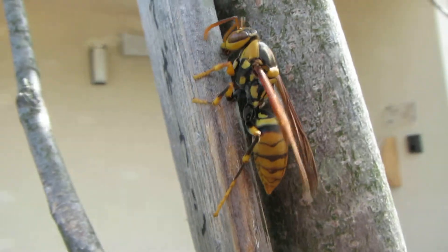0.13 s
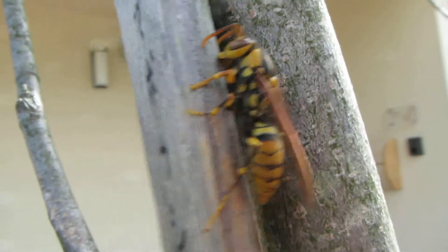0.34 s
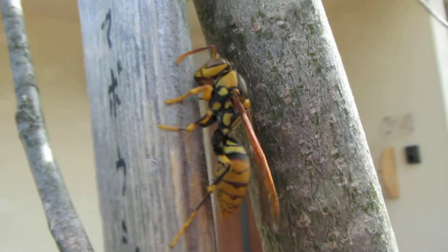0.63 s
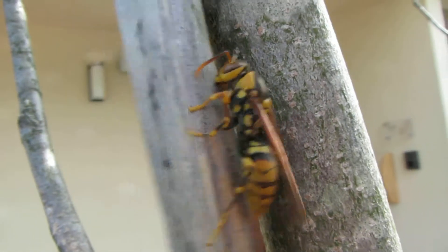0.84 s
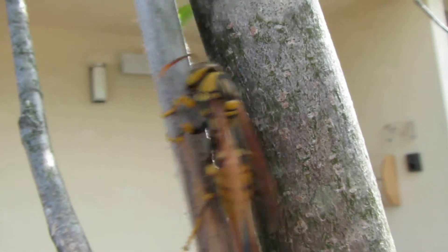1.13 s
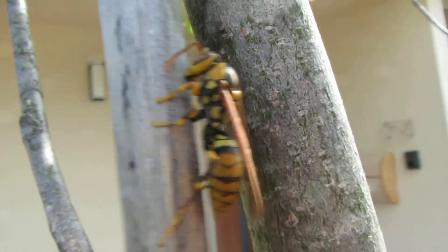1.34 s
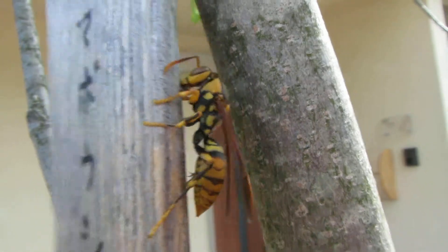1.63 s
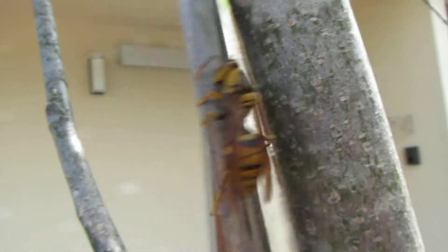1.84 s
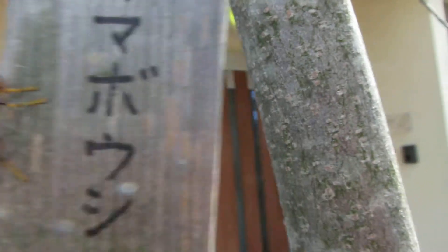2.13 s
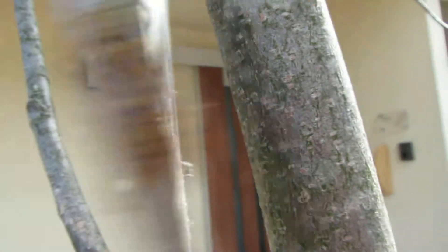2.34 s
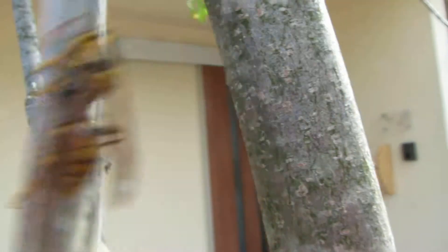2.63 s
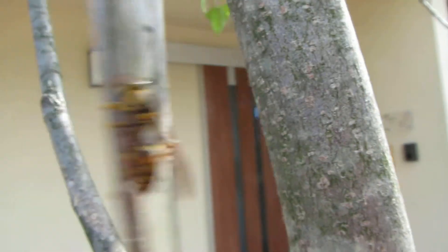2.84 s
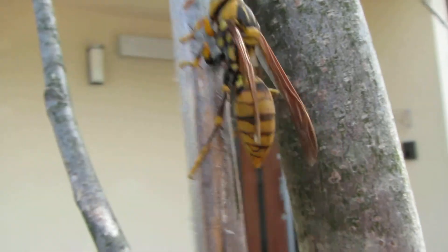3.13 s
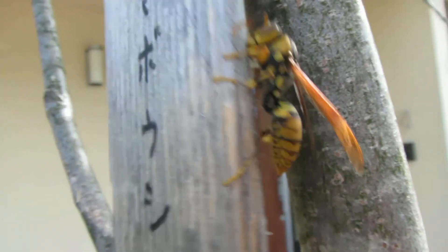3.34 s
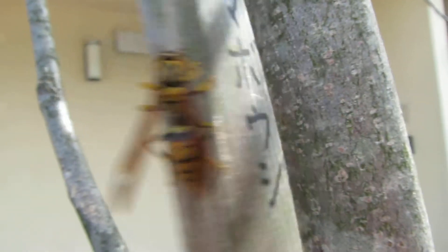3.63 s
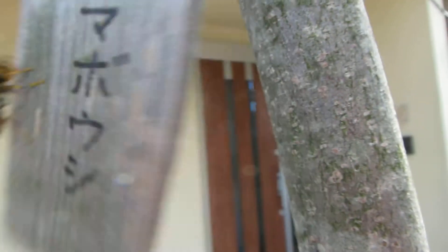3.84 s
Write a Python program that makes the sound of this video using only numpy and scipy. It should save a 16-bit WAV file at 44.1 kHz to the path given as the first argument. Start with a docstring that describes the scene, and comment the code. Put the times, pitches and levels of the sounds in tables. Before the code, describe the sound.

A wooden tag taps lightly on a tree, then clatters and knocks harder in the second half. Gusty wind buffets the nearby microphone, drops briefly and returns, over faint bird chirps and a soft outdoor hiss.

```python
"""A thin wooden tag on a string swings in gusty wind and knocks against a tree trunk, near a small camera.
From the start, eddies buffet the two microphone ports over a distant hum and hiss, and a far bird chirps.
From 0.6 s the tag strikes and grazes the bark, each knock ringing its modes. An insect hiss throbs from
1.3 to 2.7 s; near 2.5 s the tag clatters and the bird calls again. A hard knock falls in a lull at 3 s,
then the gusts return and the hardest knock comes just before the end."""
import sys
import numpy as np
from scipy import signal
from scipy.fft import rfft, irfft
from scipy.io import wavfile
from scipy.ndimage import uniform_filter1d

SR = 44100
rng = np.random.default_rng(int(sys.argv[2]) if len(sys.argv) > 2 else 0)


def transcribe(u):
    """Save the signal u as a 16-bit wav file named by the first command-line argument.

    u: samples, shape (n,) or (channels, n), limited to [-1, 1]; the rate is SR.
    q: integer samples, one column per channel.
    """
    v = np.clip(np.atleast_2d(u).T, -1, 1)
    q = np.round(v * 32767).astype(np.int16)
    wavfile.write(sys.argv[1], SR, q)


N = 176400

# Spectrum of the outdoor background: frequency_hz, gain_db
AIR_SPECTRUM = [(24, -40), (40, -19.5), (158, 3), (230, 3.5), (295, -10), (379, -4.5), (511, -10), (763, 3),
                (822, -7), (979, -3), (1260, -9), (1500, -8), (1700, -10), (3680, -21.5), (5920, -17.5),
                (11000, -26), (12700, -31), (15100, -37), (15700, -47)]
# Humps in the distant hum: centre_hz, width_hz, gain_db
HUM_PEAKS = [(475, 82, 11.5), (754, 47, 4), (1124, 160, 7.5), (1477, 31, 6.5)]
# Drift of the background: time_s, level_db, treble_db
BACKGROUND_LEVELS = [(0.0, -63, -0.5), (0.29, -60.5, 2), (0.5, -66.5, 0.5), (0.91, -61.5, -3),
                     (1.06, -65, -1), (1.57, -62, 2), (2.66, -58, 5.5), (2.88, -56.5, 6.5),
                     (3.89, -54.5, -3), (4.0, -51, -13)]
# Likeness of the background at the two ports: frequency_hz, correlation
COHERENCE = [(60, 0.31), (300, 1), (1400, 0.13), (3100, 0.75), (6800, .3), (12000, -0.013)]
# Strength of the insect throb: time_s, depth_db
THROB_DEPTH = [(1.3, 0), (1.6, 4), (2.4, 4), (2.7, 0)]
# Bird notes: start_s, length_s, start_hz, middle_hz, end_hz, level_db
BIRD_NOTES = [(0.169, 0.014, 4150, 4320, 4500, -65), (0.212, 0.021, 4280, 5080, 4020, -58),
              (0.231, 0.016, 4180, 4520, 3820, -54), (0.256, 0.02, 4310, 4520, 4460, -57),
              (0.256, 0.015, 3000, 3400, 3200, -67), (0.269, 0.024, 3440, 3290, 3000, -64),
              (0.304, 0.025, 3390, 3300, 3200, -66.5), (0.389, .016, 4280, 4680, 5000, -70),
              (0.618, .085, 3400, 3450, 3380, -82), (.705, .05, 3260, 3050, 2850, -75),
              (3.486, 0.041, 2950, 2790, 2650, -69), (0.396, 0.031, 3650, 3270, 2900, -70.5),
              (2.522, 0.0203, 3950, 5000, 4200, -64), (2.541, .016, 4550, 4260, 3700, -55),
              (2.556, .02, 4960, 4870, 4850, -69), (2.57, 0.019, 2920, 3300, 3700, -64),
              (2.576, 0.0214, 3520, 3300, 2900, -59), (2.604, 0.04, 3280, 3300, 3240, -66)]
# Gusts on the ports: time_s, level_db, buffet_re_rumble_db, leftward_lean
GUSTS = [(0.0, -36, -8, 4), (0.02, -27.5, -11, 4.5), (0.08, -36.5, -44, -8.5), (0.121, -30.5, -9, 6.5),
         (0.18, -32.5, -17, -2), (0.26, -35.5, -25.5, 4), (0.308, -25, -2.5, -0.5),
         (0.369, -29.5, -11, 4.5), (0.41, -39.5, -22, 0), (0.479, -32.5, -15, 0), (0.588, -30.5, -64, -3),
         (0.629, -63.5, 3.5, 3), (0.8, -46, -49, -4), (0.821, -44, -16, 8.5), (0.878, -20.5, -16.5, -3),
         (0.922, -36.5, -22, 2.5), (0.959, -24.5, -5, 3.5), (0.99, -31, -34, -17), (1.01, -50.5, -3, 1.5),
         (1.061, -26, -13, -2), (1.091, -47, -49, -3), (1.16, -41.5, -28.5, 2), (1.299, -24.5, -1, 3.5),
         (1.36, -36, 1, -2), (1.399, -37, -7.5, -3.5), (1.44, -53.5, -54, 5.5), (1.48, -31.5, -19, 1),
         (1.49, -39.5, -48, -0.5), (1.54, -58.5, -31, -4), (1.59, -42.5, -14.5, 3.0),
         (1.68, -44.5, -19, -2.5), (1.71, -33.5, -33, 0), (1.84, -49.5, -41, 0), (1.871, -43.5, -4.5, 12),
         (1.902, -24.5, 2, 6.5), (1.929, -47, -14.5, 7), (2.08, -48.5, -39, -2.5), (2.19, -47.5, -58, 8),
         (2.26, -56.5, -26, -2.5), (2.32, -41.5, -49, 8), (2.341, -29, -19, -0.5), (2.39, -40, -32, -2),
         (2.479, -38.5, 11.5, -0.5), (2.52, -35, -25, -1), (2.629, -33.5, -23, 4.5),
         (2.72, -60.5, -6.5, -0.5), (3.17, -71, 7, -3), (3.298, -35.5, -14.5, 6.5), (3.36, -37, -26, -6.5),
         (3.42, -50, -0.5, 5), (3.48, -47.5, -12, -1), (3.61, -36.5, -40, 2), (3.629, -24.5, -12.5, 3.5),
         (3.73, -23, -24, 7.5), (3.779, -39.5, -27, 1), (3.832, -25, -8.5, 1.5), (3.951, -27.5, 6, 4.5),
         (4.0, -26, -7, -2)]
# Spectra of the wind's low rumble and upper buffeting: frequency_hz, gain_db
RUMBLE_SPECTRUM = [(12, -53), (24, -37), (55, -2), (123, 6.5), (189, 1), (243, -4.5), (441, -20),
                   (700, -34.5), (910, -62), (1540, -120)]
BUFFET_SPECTRUM = [(120, -3.5), (250, 7), (350, 3), (600, -3.5), (1000, -15.5), (1600, -42.5), (3000, -72),
                   (6000, -125)]
# Strongest single eddies: time_s, level_db, width_ms, left_re_right_db
EDDY_SLAPS = [(0.2968, -19, 0.73, 9), (.3172, -24, 0.5, -30), (0.357, -11.5, 0.67, 27),
              (0.3705, -24, 0.8, 10), (0.4656, -29.5, 0.66, -23.5), (0.834, -18, 1.06, 34),
              (0.8749, -30.5, 0.72, -12), (0.9556, -11, 0.89, 32), (.9729, -29, 0.67, -19),
              (1.0566, -22, 0.97, -32), (1.26, -19, 0.79, 15), (1.2681, -16.5, 0.57, 33),
              (1.2984, -15.5, 0.73, 2), (1.309, -11.5, 1.22, 17), (1.3238, -14.5, 0.75, 29),
              (1.3666, -23, 1, 22), (1.475, -22, 0.9, 28), (1.724, -19.5, 1.24, -23),
              (1.767, -29.5, 1.5, 11), (1.8823, -26, 0.96, 31), (1.9068, -10, 0.8, 17),
              (2.337, -28, 0.79, -28), (2.474, -17.5, 0.78, -25), (3.6481, -17, 0.59, 30),
              (3.6837, -17, 0.88, 20), (3.721, -15, 1.37, 32), (3.737, -19, 0.76, 25),
              (3.853, -16.5, 1.01, 20), (3.8738, -16, 0.78, 25), (3.9006, -16.5, 0.87, 28),
              (3.9349, -24, .8, 25), (3.9491, -10.5, 0.62, 15)]
# Sharp pops at the moments of the hardest eddies: time_s, level_db
SHARP_POPS = [(0.3569, -35.5), (0.956, -40), (1.3077, -36.5)]
# Spectrum of a pop: frequency_hz, gain_db
POP_SPECTRUM = [(500, 11), (1500, -8.5), (3000, -2.5), (5000, -12), (9000, -27), (15000, -46)]
# Wood grazing bark: start_s, peak_db, decay_s
BARK_TICKS = [(0.623, -55, 0.003), (0.628, -49, 0.0027), (0.641, -53, 0.003), (0.659, -54.5, 0.0037),
              (0.836, -57, 0.0032), (0.853, -50.5, 0.0024), (1.311, -44, 0.0016), (1.584, -47.5, 0.0021),
              (1.592, -52, 0.0027), (1.8566, -49, 0.0034), (2.065, -50, 0.0036), (2.229, -59, 0.0027),
              (2.459, -50, 0.002), (2.4765, -38, 0.0017), (2.987, -39.5, 0.01), (3.125, -40, 0.008),
              (3.135, -46, 0.0042), (3.3797, -41.5, 0.0016), (3.46, -47, 0.021), (3.589, -46.5, 0.0036),
              (3.723, -38, 0.0046), (3.9434, -43, 0.0031)]
# Spectra of bright contact noise and of the woody rattle between the modes: frequency_hz, gain_db
CONTACT_SPECTRUM = [(2500, 4), (4000, -9.5), (5400, 4), (8300, 5), (10500, 0.5), (12600, -3.5),
                    (15500, -12)]
RATTLE_SPECTRUM = [(300, -18), (800, -5), (1800, 6.5), (2550, -30), (3200, -9.5), (4800, -23.5),
                   (7000, -43)]
# Modes of the tag: pitch_hz, face_contact_db, edge_contact_db, t60_s
TAG_MODES = [(1065, -13, -9, 0.11), (1460, -23, -37, 0.11), (1270, 0, 0, .06), (2164, 0, 0, .068),
             (2934, -28.5, 1.5, 0.04), (3140, -36.5, -34.5, .012), (4400, -23, -14, 0.0081),
             (5320, -9, -26.5, 0.023), (6120, -22.5, -7, 0.021), (8340, -8.5, -31.5, 0.014),
             (9900, -15, -15, 0.0049), (12460, -5.5, -6.5, 0.0027)]
# Knocks of the tag: start_s, level_db, low_modes_db, edge_fraction, treble_db
TAG_KNOCKS = [(0.621, -69.5, -16, 0.5, -4), (0.6454, -61, -12, 0.4, -1), (0.7592, -61.5, -13, 0.6, 1),
              (0.9307, -43, 3, 0.33, -2), (1.206, -63.5, 2, 0.6, 8), (1.2526, -62.5, 4, 0.3, -7),
              (1.5843, -62, -12, 0.4, 12), (1.644, -56, -9, 0.4, -8), (2.0298, -59, -11, 0.4, -11),
              (2.2388, -64.5, 0, 0.6, -8), (2.4329, -48, -2, 0.64, 5), (2.4554, -50, -5, 0.3, -2),
              (2.4655, -51, -4, 0.4, -4), (2.4775, -34.5, 1.5, 0.44, -4), (2.4924, -47, -3, 0.4, -16),
              (2.5277, -56, -11, 0.5, -8), (2.9933, -43, 5.5, 0.1, -11), (2.9977, -25.5, -2, 0.12, -1.5),
              (3.0465, -55, -5, 0.3, -3), (3.1265, -61, -6, 1, -6), (3.3804, -45, -12, 0.62, -16),
              (3.4161, -39.5, -2.5, 0.5, -1), (3.4374, -52, -21, 0.5, 10), (3.4524, -53.5, -2, 0.3, 7),
              (3.5638, -49, -4, 0.2, 1), (3.6192, -58, -11, 0.4, 2), (3.7233, -53.5, 1, 0, 15),
              (3.9295, -50, -17, 0.3, -3), (3.9521, -21.5, -22, 0.8, 5)]
# Dull thuds of the tag on the trunk: start_s, level_db, width_ms
TRUNK_THUDS = [(2.432, -34.5, 0.36), (2.455, -28, 0.29), (2.478, -26, 0.3), (2.487, -27, 0.24),
               (2.491, -28, 0.39), (2.497, -31.5, 0.423), (2.99, -38.5, 0.78), (2.9974, -26, 0.262),
               (3.379, -27, 0.39), (3.416, -23.5, 0.28), (3.437, -31.5, 0.36), (3.449, -31.5, 0.5),
               (3.464, -48, 0.33), (3.562, -30.5, 0.38)]
# Microphone self-noise: frequency_hz, gain_db
SELF_NOISE_SPECTRUM = [(4000, -28), (9000, 0), (13500, -4.5), (16000, -6)]

THROB_HZ, THROB_CREST_S, INSECT_HZ, INSECT_WIDTH_HZ = 10.2, 1.688, 5800, 2100
WARBLE_DEPTH_HZ, BIRD_RASP = 131, 0.89
EDDIES_PER_S, EDDY_SPREAD_DB, SPUTTER_DB, DB_PER_LEAN = 260, 5, 2.5, 2.7
CONTACT_S, FREE_RING_S, CHOKE_DB_PER_S, WAVER_DB = 0.00038, 0.045, 900, 2.5
CRACK_DB, CRACK_DECAY_S, RATTLE_DB, RATTLE_DECAY_S = -11, 0.00051, -10.5, 0.0055
WIDEN_DB, WIDEN_BELOW_HZ, NOTCH_HZ, NOTCH_WIDTH_HZ, NOTCH_DB = 8.5, 850, 3880, 490, -6.5
SELF_NOISE_DB, CEILING, BAND_LIMIT_HZ = -86, 0.78, 15830


def gain_of(db):
    return 10 ** (np.asarray(db) / 20)


def unit_rms(x):
    return x / np.sqrt(np.mean(x ** 2) + 1e-20)


def curve_at(points, hz):
    """Interpolation on a logarithmic frequency axis."""
    point_hz, value = np.transpose(points)
    return np.interp(np.log(hz + 1), np.log(point_hz + 1), value)


def bell(hz, centre_hz, width_hz):
    """Lorentzian curve of unit height."""
    return 1 / (1 + (2 * (hz - centre_hz) / width_hz) ** 2)


def slow_drift(noise, samples):
    """Two moving averages leave only the slow fluctuations of noise."""
    return unit_rms(uniform_filter1d(uniform_filter1d(noise, samples), samples))


def add(mix, start_s, sound):
    """Superposition: a sound sums into the mix from its start time."""
    part = mix[..., round(start_s * SR):][..., :sound.shape[-1]]
    part += sound[..., :part.shape[-1]]


def colour(x, spectrum):
    """Zero-phase filtering by a gain curve."""
    hz = np.fft.rfftfreq(x.shape[-1], 1 / SR)
    return irfft(rfft(x) * gain_of(curve_at(spectrum, hz)), x.shape[-1])


def pan(left_re_right_db):
    """A level difference between the ports, as two gains that average to one."""
    gains = gain_of(np.vstack([left_re_right_db / 2, -left_re_right_db / 2]))
    return 2 * gains / gains.sum(0)


def reflections(x, t60_s):
    """Diffuse outdoor reflections decay exponentially and differ at each port."""
    t = np.arange(SR // 4) / SR
    response = rng.standard_normal((2, len(t))) * gain_of(-60 * t / t60_s) * (t > .004)
    return signal.fftconvolve(x[None], response / np.linalg.norm(response[0]), axes=1)[:, :N]


def insect_throb(t, hz, flicker):
    """Amplitude modulation: a nearly periodic gain, in dB, on the insects' band of hiss."""
    wander = unit_rms(uniform_filter1d(rng.standard_normal(len(t)), 25))
    phase = 2 * np.pi * THROB_HZ * (t - THROB_CREST_S) + .35 * wander
    pulses = np.tanh(1 + 2.5 * np.cos(phase)) - .25
    band = np.exp(-((hz - INSECT_HZ) / INSECT_WIDTH_HZ) ** 2)
    return np.interp(t, *np.transpose(THROB_DEPTH)) * pulses * (1 + .3 * flicker) * band


def background():
    """Partly coherent noise at the two ports: distant hum below, flickering insect hiss above."""
    frames = N // 128 + 5
    t, hz = np.arange(frames) * 128 / SR, np.fft.rfftfreq(512, 1 / SR)[:, None]
    time_s, level_db, treble_db = np.transpose(BACKGROUND_LEVELS)
    left_re, left_im, other_re, other_im, patches = rng.standard_normal((frames, 257, 5)).T
    left, other = left_re + 1j * left_im, other_re + 1j * other_im
    coherence = curve_at(COHERENCE, hz)
    right = coherence * left + np.sqrt(1 - coherence ** 2) * other
    patches_db = 1.4 * unit_rms(uniform_filter1d(uniform_filter1d(patches, 8, 0), 16, 1))
    flicker_db = unit_rms(uniform_filter1d(rng.standard_normal(frames), 4))
    hiss_db = np.interp(t, time_s, treble_db) + insect_throb(t, hz, flicker_db) + flicker_db
    treble_band = np.clip((hz - 2500) / 1500, 0, 1)
    spectra = np.array([left, right]) * gain_of(patches_db + treble_band * hiss_db)
    noise = signal.istft(spectra, nperseg=512, noverlap=384)[1][:, :N]
    fine_hz = np.fft.rfftfreq(N, 1 / SR)
    hum_db = sum(db * bell(fine_hz, centre, width) for centre, width, db in HUM_PEAKS)
    air = unit_rms(irfft(rfft(noise) * gain_of(curve_at(AIR_SPECTRUM, fine_hz) + hum_db), N))
    return air * gain_of(0.5 + np.interp(np.arange(N) / SR, time_s, level_db))


def bird():
    """Gliding whistles: random frequency modulation makes them warble, amplitude modulation rasp."""
    song = np.zeros(N)
    warble_hz = WARBLE_DEPTH_HZ * slow_drift(rng.standard_normal(N), samples=150)
    for at, length_s, start_hz, middle_hz, end_hz, db in BIRD_NOTES:
        progress = np.arange(0, 1, 1 / (length_s * SR))
        arch = np.sin(np.pi * progress)
        hz = start_hz + (end_hz - start_hz) * progress + (middle_hz - (start_hz + end_hz) / 2) * arch
        hz += warble_hz[round(at * SR):][:len(hz)]
        add(song, at, gain_of(db) * arch * np.sin(2 * np.pi * np.cumsum(hz) / SR))
    song *= 1 + BIRD_RASP * unit_rms(uniform_filter1d(rng.standard_normal(N), 60))
    return song + gain_of(-0.5) * reflections(song, t60_s=0.21)


def wind():
    """Turbulence: sparse eddies pass each port independently, driving both rumble and buffeting."""
    t = np.arange(N) / SR
    time_s, *columns = np.transpose(GUSTS)
    level_db, buffet_db, lean = (np.interp(t, time_s, column) for column in columns)
    sizes = gain_of(EDDY_SPREAD_DB * np.minimum(rng.exponential(1, (2, N)), 2))
    signs = rng.choice([-1., 1.], (2, N))
    eddies = unit_rms(sizes * signs * (rng.random((2, N)) < EDDIES_PER_S / SR))
    flutter = colour(rng.standard_normal((2, N)), [(5, -20), (15, 0), (50, 0), (120, -30), (400, -90)])
    sputter = unit_rms(gain_of(SPUTTER_DB * unit_rms(flutter)))
    steady = rng.standard_normal((2, N))
    rumble = unit_rms(colour(eddies + 0.67 * steady, RUMBLE_SPECTRUM))
    buffet = unit_rms(colour(eddies + 0.23 * steady, BUFFET_SPECTRUM)) * gain_of(buffet_db)
    return (rumble + buffet) * gain_of(level_db) * sputter * pan(DB_PER_LEAN * lean)


def eddy_slaps():
    """Each strong eddy is a single pressure pulse; sharp pops also sound at three listed times."""
    out = np.zeros((2, N))
    for at, db, width_ms, pan_db in EDDY_SLAPS:
        u = np.arange(-600, 600) / (SR * width_ms / 1000)
        pulse = (1 - u ** 2) * np.exp(-u ** 2 / 2)
        add(out, at - 600 / SR, gain_of(db) * pulse * pan(pan_db))
    pop = colour(signal.unit_impulse(1024, 512), POP_SPECTRUM)
    for at, db in SHARP_POPS:
        add(out, at - 480 / SR, gain_of(db) * pop / pop.max() * pan(6))
    return out


def bark_ticks():
    """Friction: wood grazing bark gives tiny puffs of bright noise, unlike at the two ports."""
    out, t = np.zeros((2, N)), np.arange(2048) / SR
    for at, db, decay_s in BARK_TICKS:
        noise = rng.standard_normal((2, len(t)))
        envelope = np.minimum(t / 0.0012, 1) * np.exp(-t / decay_s)
        puff = colour(noise + noise[::-1] / 4, CONTACT_SPECTRUM) * envelope
        add(out, at, gain_of(db) * puff / abs(puff).max())
    return out


def trunk_thuds():
    """Impact: each dull thud on the trunk, between 2.4 and 3.6 s, is a compression then a rarefaction."""
    out, t = np.zeros(N), np.arange(6000) / SR
    for at, db, width_ms in TRUNK_THUDS:
        u = t / (width_ms / 1000) - 7
        add(out, at, -gain_of(db) * u * np.exp(.5 - u ** 2 / 2))
    return out


def tag_modes(t, edge_fraction, low_db, treble_db):
    """Free vibration is a sum of damped modes, weighted by where the contact falls, face to edge."""
    ring = np.zeros(len(t))
    for hz, face_db, edge_db, t60_s in TAG_MODES:
        contact_db = face_db + edge_fraction * (edge_db - face_db)
        tilt_db = low_db if hz < 1400 else treble_db if hz > 4000 else 0
        ring += gain_of(contact_db + tilt_db - 60 * t / t60_s) * np.sin(2 * np.pi * hz * t)
    return ring


def wooden_tag():
    """Impulsive excitation: each knock cracks, rattles and rings the tag; thuds have their own times."""
    ring, contact, t = np.zeros(N), np.zeros((2, N)), np.arange(6000) / SR
    next_starts = [knock[0] for knock in TAG_KNOCKS[1:]] + [N / SR]
    for (at, db, low_db, edge_fraction, treble_db), next_s in zip(TAG_KNOCKS, next_starts):
        noise = rng.standard_normal((2, len(t)))
        waver_db = WAVER_DB * slow_drift(noise[1], samples=200)  # a rattling contact makes the ring waver
        # The next contact, or settling on the bark, damps the ring.
        choke_db = CHOKE_DB_PER_S * np.maximum(t - min(next_s - at, FREE_RING_S), 0)
        attack = 1 - np.exp(-(t / CONTACT_S) ** 2)
        modes = tag_modes(t, edge_fraction, low_db, treble_db)
        add(ring, at, gain_of(db + waver_db - choke_db) * attack * modes)
        crack = unit_rms(colour(noise, CONTACT_SPECTRUM)) * np.exp(-t / CRACK_DECAY_S)
        rattle = unit_rms(colour(noise[0, ::-1], RATTLE_SPECTRUM)) * np.exp(-t / RATTLE_DECAY_S)
        add(contact, at, gain_of(db + treble_db + CRACK_DB) * crack + gain_of(db + RATTLE_DB) * rattle)
    thuds = trunk_thuds()
    echoes = gain_of(-21) * reflections(ring + thuds, t60_s=0.2)
    return ring * pan(2.2) + contact + thuds * pan(6) + echoes


def scene():
    """Superposition: the pressures of all sources add at each port."""
    return wind() + eddy_slaps() + wooden_tag() + bark_ticks() + bird() + background()


def record(dry):
    """Mid-side widening of the close ports' bass, then a notch, self-noise, saturation and band limit."""
    mid, side = (dry[0] + dry[1]) / 2, (dry[0] - dry[1]) / 2
    side += (gain_of(WIDEN_DB) - 1) * signal.lfilter(*signal.butter(1, WIDEN_BELOW_HZ, fs=SR), side)
    margin = 2000  # samples of room for the filters to ring
    wide = np.pad([mid + side, mid - side], ((0, 0), (margin, margin)), "reflect")
    length = wide.shape[1]
    notch_db = NOTCH_DB * bell(np.fft.rfftfreq(length, 1 / SR), NOTCH_HZ, NOTCH_WIDTH_HZ)
    notched = irfft(rfft(wide) * gain_of(notch_db), length)
    hiss = unit_rms(colour(rng.standard_normal(wide.shape), SELF_NOISE_SPECTRUM))
    noisy = notched + gain_of(SELF_NOISE_DB) * hiss
    saturated = noisy / (1 + (noisy / CEILING) ** 4) ** .25
    end_fade = np.minimum(abs(np.arange(length) - margin - N) / 150, 1)
    lowpass = signal.firwin(1023, BAND_LIMIT_HZ, window=("kaiser", 10), fs=SR)
    return signal.oaconvolve(saturated * end_fade, lowpass[None], "same")[:, margin:-margin]


dry = scene()
out = record(dry)
transcribe(out)
```